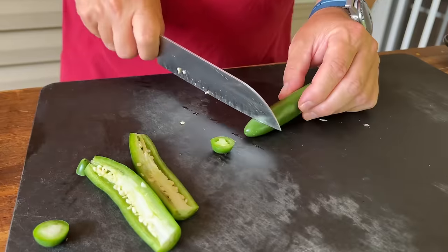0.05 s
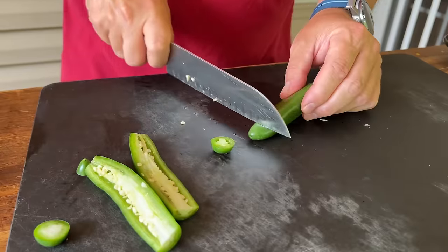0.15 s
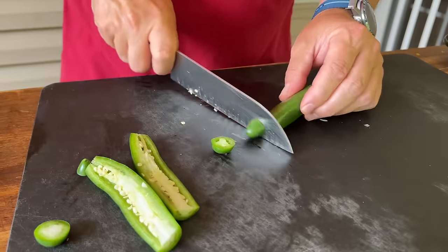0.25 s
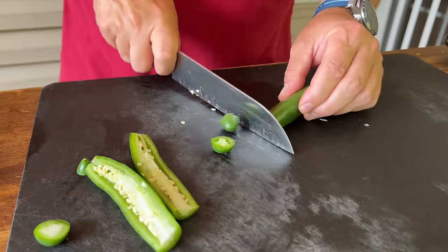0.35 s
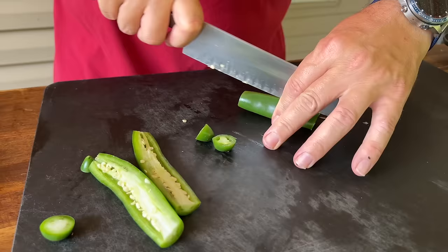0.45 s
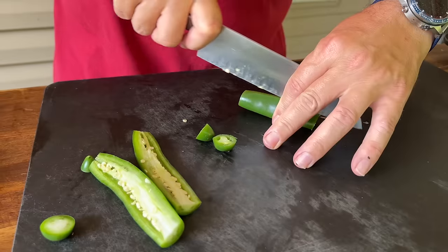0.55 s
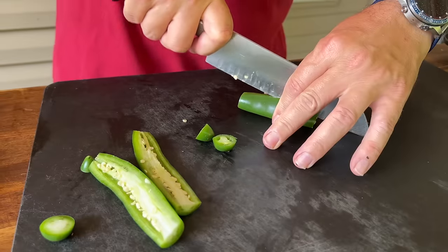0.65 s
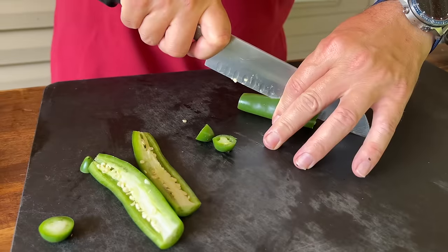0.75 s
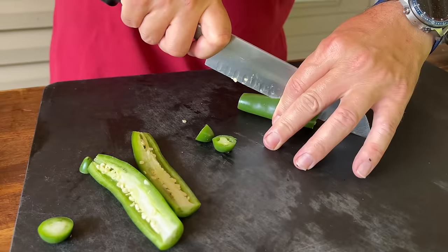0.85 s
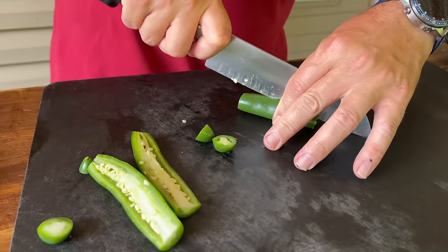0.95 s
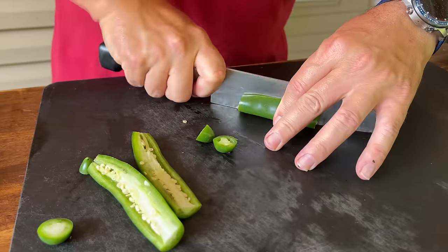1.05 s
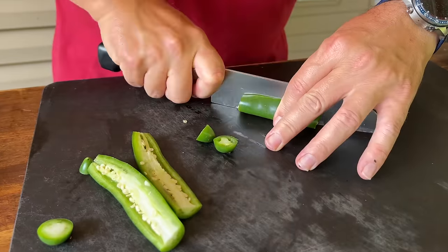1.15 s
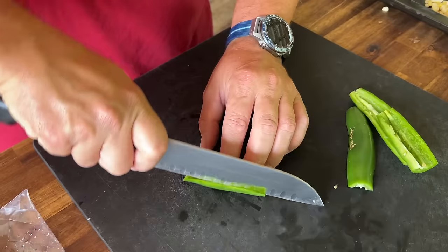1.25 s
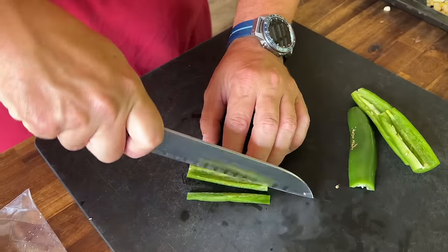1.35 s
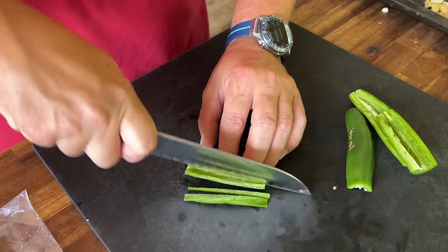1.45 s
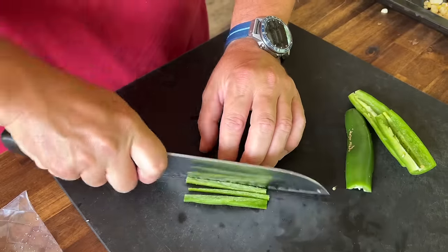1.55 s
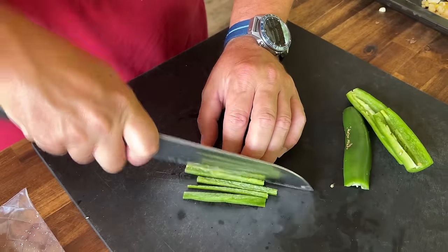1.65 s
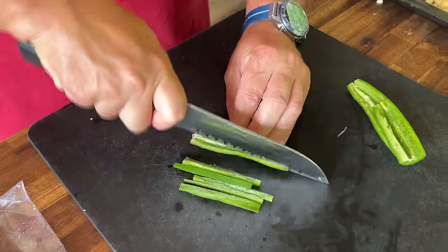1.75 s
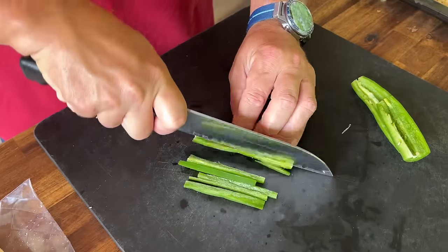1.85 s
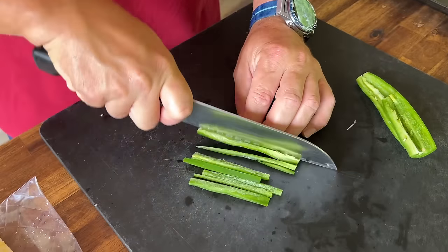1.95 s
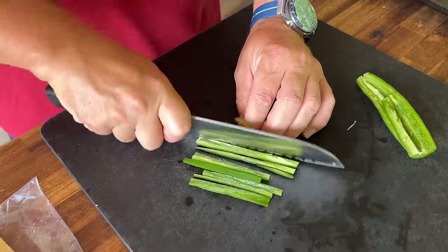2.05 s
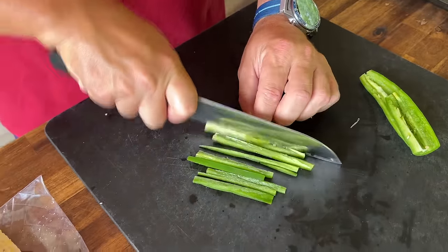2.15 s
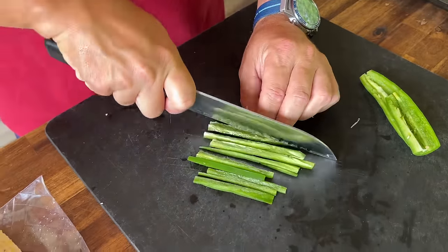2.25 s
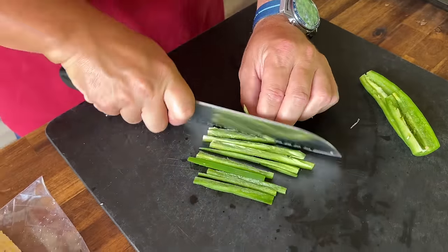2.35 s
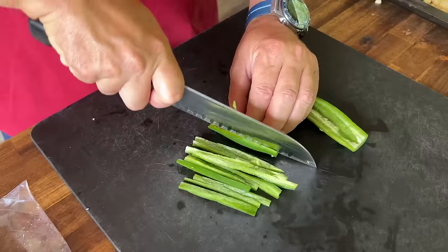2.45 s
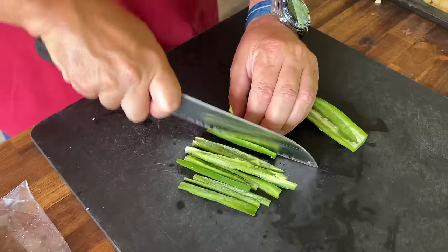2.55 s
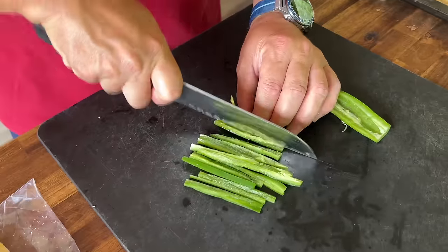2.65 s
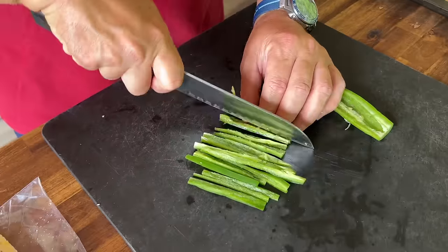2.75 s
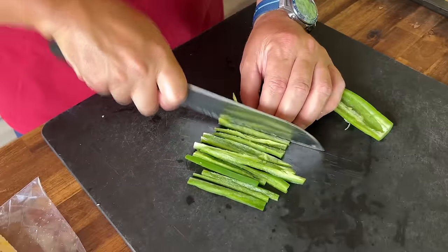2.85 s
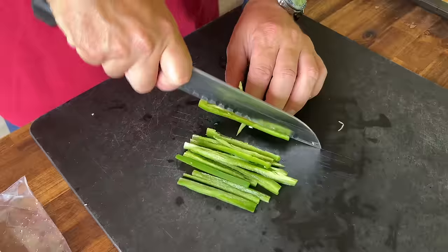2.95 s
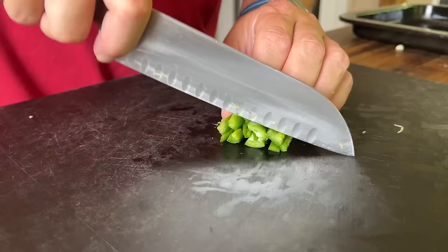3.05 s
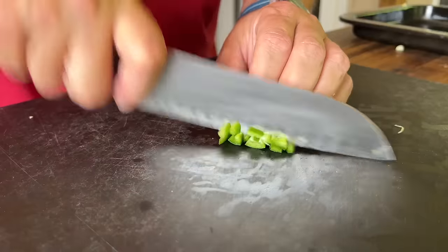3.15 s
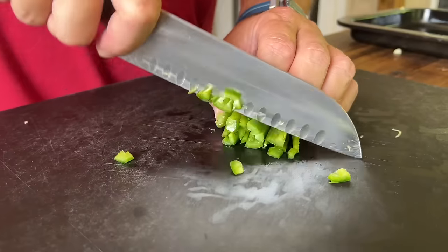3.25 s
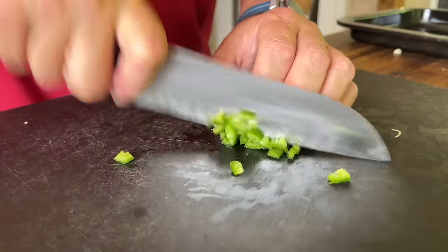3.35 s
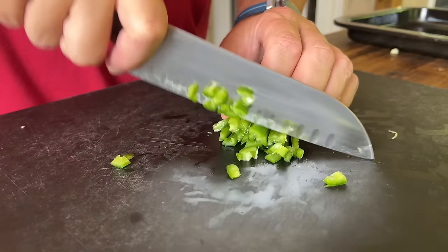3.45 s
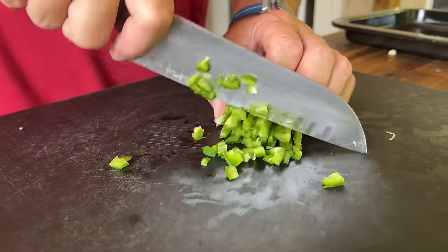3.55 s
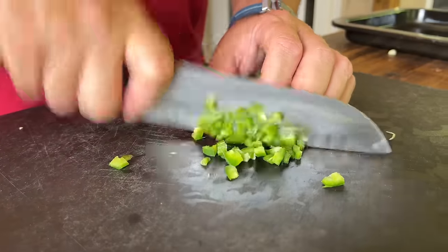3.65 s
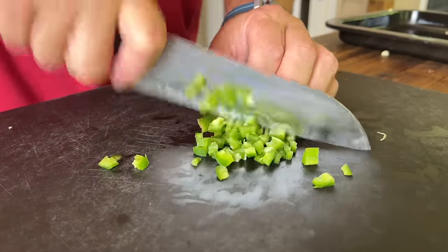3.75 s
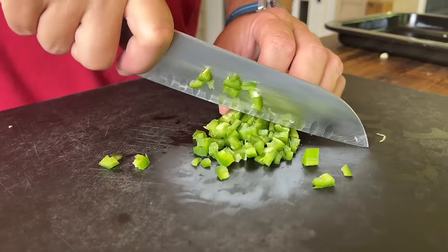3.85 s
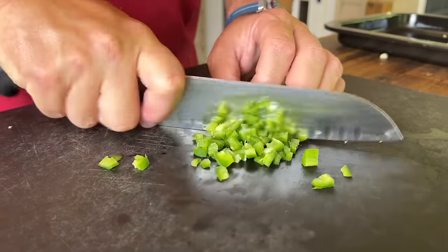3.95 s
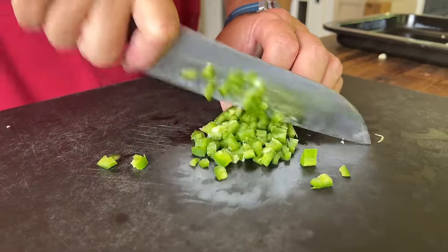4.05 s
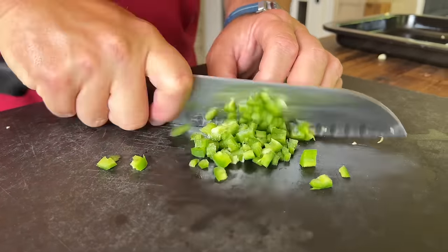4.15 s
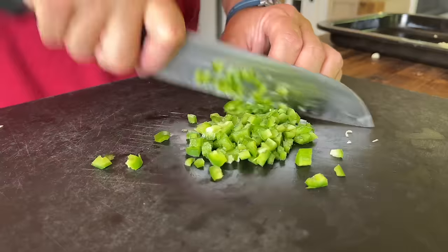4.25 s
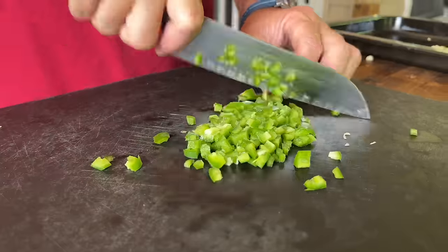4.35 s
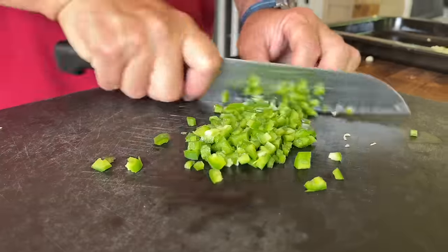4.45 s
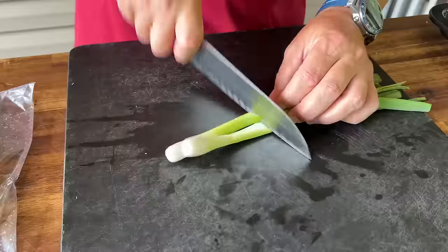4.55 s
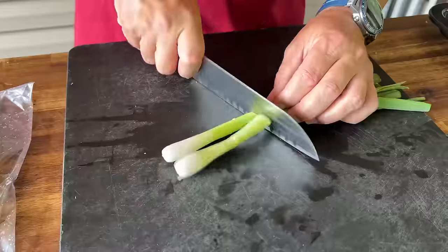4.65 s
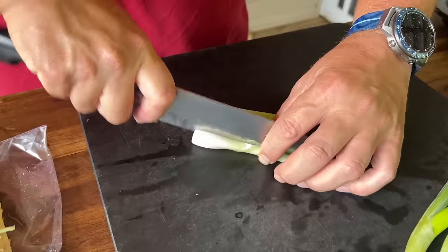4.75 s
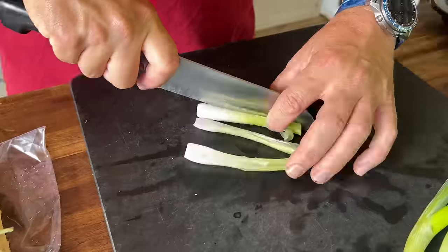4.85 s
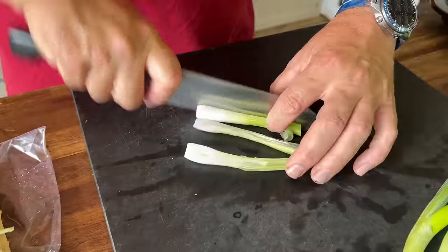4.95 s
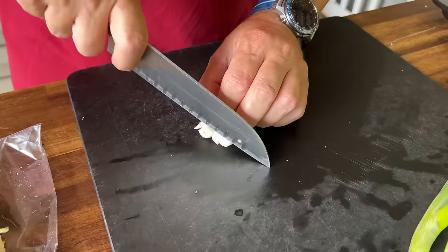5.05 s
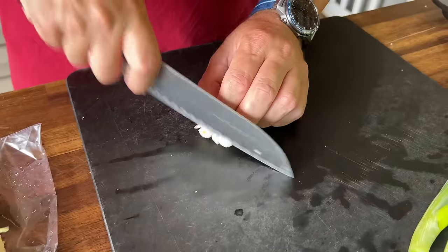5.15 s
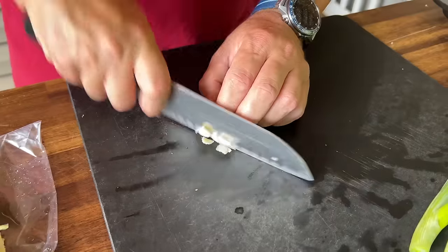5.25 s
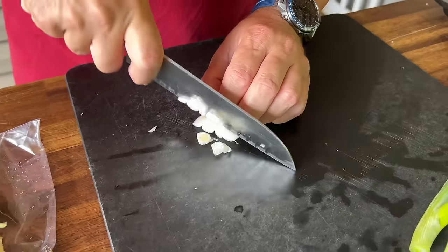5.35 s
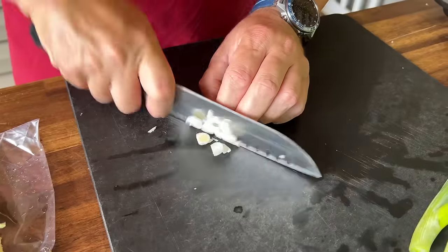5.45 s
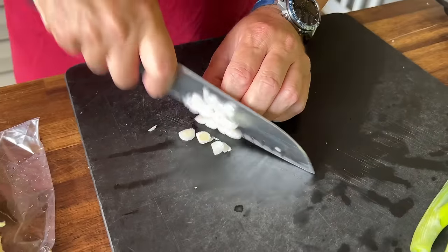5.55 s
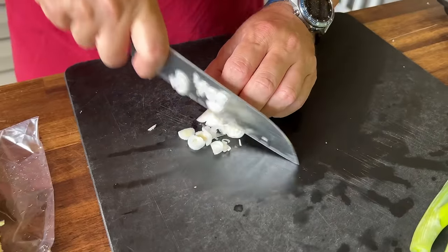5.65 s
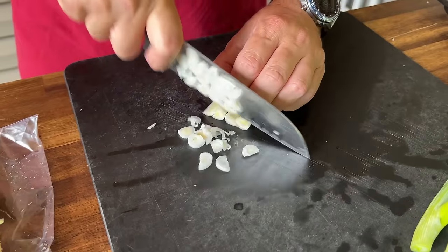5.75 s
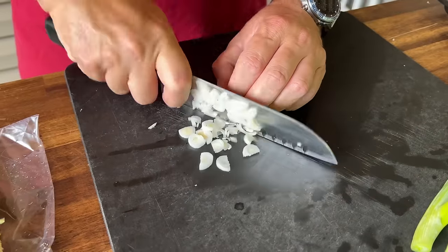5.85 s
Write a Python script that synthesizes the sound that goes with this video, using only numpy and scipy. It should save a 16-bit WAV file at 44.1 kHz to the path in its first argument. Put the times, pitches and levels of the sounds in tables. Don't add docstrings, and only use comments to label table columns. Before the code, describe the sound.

Close stereo sound of a chef's knife cutting green peppers and spring onions on a plastic board over a wooden table. Two hard clacks come early, then a pause, then crisp tearing strokes with snapping skin and dull thumps, fastest and fullest in the middle. Lighter, more spaced cuts end it. Distant insects and light breeze outdoors; edits cut thumps and echoes short.

```python
import sys
import numpy as np
from scipy import signal
from scipy.fft import rfft, irfft, next_fast_len
from scipy.io import wavfile
from scipy.ndimage import uniform_filter1d, map_coordinates

SR = 44100
rng = np.random.default_rng(int(sys.argv[2]) if len(sys.argv) > 2 else 0)


def dump_mix(stems):
    frames = np.atleast_2d(stems).T
    limited = np.clip(frames, -1, 1)
    pcm = np.round(limited * 32767).astype(np.int16)
    wavfile.write(sys.argv[1], SR, pcm)


def volts_from_db(level):
    exponent = np.asarray(level, float) / 20
    return 10 ** exponent


N = 259749

# pitch_hz, level_db
PORCH = [(30, -36), (90, 9), (232, 0.5), (483, -6), (766, -14.5), (1360, -13), (2400, -20), (4130, -12.5),
         (4600, -15.5), (5130, -13.5), (7510, -20.5), (9580, -38), (11600, -45), (15200, -29), (16500, -35)]
PORCH_DB, INSECT_DB, RUMBLE_DB, LEAVES_DB = -56, -64.5, -54, -64.5
# time_s, level_db
BREEZE = [(0, -2.5), (.35, 4), (1.2, -1.8), (1.7, 0.5), (2.4, -2.5), (3.2, 1), (4.6, 5.5), (5.05, -5),
          (5.3, 4), (5.89, -3.5)]
# time_s, level_db
HANDS = [(0, -3), (.9, -15.5), (1.1, -3), (2.4, -18), (2.55, -6), (4.6, -6), (4.95, 3.5), (5.1, -12),
         (5.89, -3)]
# pitch_hz, width_hz, level_db
WING = [(4620, 250, -10.5), (5210, 210, -1), (5590, 250, -6.5), (6490, 220, -8.5), (5600, 1800, -14)]
# first_pulse_s, end_s, level_db, pulse_rate_hz
SWELLS = [
    (0.75, 1.148, 4.5, 55),
    (1.361, 1.619, 15, 56.7),
    (2.3953, 2.799, 15.5, 54.3),
    (2.789, 2.956, 14.5, 53.4),
    (3.276, 3.79, 10.5, 55),
    (4.201, 4.444, 10.5, 54),
]
CHIRP_DB, CHIRP_RISE = 18, .15

# pitch_hz, t60_s
WALLS = [(100, 0.2), (500, 0.64), (2000, 0.29), (6000, 0.3), (9000, 0.17), (14000, 0.14)]
REFILL_S = 0.043
WASH_DIP = 0.28

# pitch_hz, difference_minus_sum_db
PORTS = [(60, -23), (99, -12.5), (160, -14), (270, -14), (450, -11), (740, -5.5), (1220, -6), (2010, -1.5),
         (3330, 1), (5500, -1.5), (9080, 3.5), (15000, -4)]
# pitch_hz, lead_radians
TURN = [(100, 0.55), (1200, 1.65), (2200, 1.37), (4000, 0.86), (6400, 0.87), (8300, 1.52), (15000, 1.56)]
# low_hz, high_hz, threshold_db
SQUELCH = [
    (9000, 9650, -71),
    (9650, 11000, -64),
    (11000, 11700, -77),
    (11700, 12400, -81),
    (12400, 13100, -82),
    (13100, 13800, -82),
    (13800, 14500, -82),
    (14500, 15200, -81),
    (15200, 15900, -76),
    (15900, 16800, -70),
]

# time_s, pitch_hz, level_db, t60_s
NOTES = [(1.062, 990, -35, 0.096), (1.707, 810, -37, 0.065), (1.943, 1070, -34, .04),
         (1.965, 754, -34.5, 0.041), (2.203, 835, -35, 0.075), (2.232, 990, -43.5, 0.048),
         (2.1, 310, -47, 0.1), (2.622, 990, -35.5, 0.07), (2.725, 1005, -27.5, 0.049),
         (2.893, 833, -29, 0.076), (3.21, 318, -33.5, .078), (3.408, 1020, -30.5, .04),
         (3.68, 977, -32, 0.074), (3.82, 443, -30, 0.078), (3.958, 990, -32.5, .07), (4.7, 920, -44, .09),
         (4.148, 516, -40, 0.05), (4.298, 950, -31, 0.097), (4.302, 553, -32.5, 0.014),
         (4.442, 556, -14.5, .019), (4.735, 865, -41.5, 0.056), (4.83, 950, -42.5, 0.076),
         (5.469, 947, -37.5, 0.077)]
# time_s, pitch_hz, level_db, t60_s
TICKS = [(.0745, 900, -37.5, 0.015), (.184, 900, -37.5, .01), (.2445, 743, -18, 0.014),
         (.2535, 1960, -13.5, .02), (.2585, 1960, -17.5, .014), (.2665, 920, -17.5, .04),
         (.5, 1600, -48, .015), (.568, 2020, -44, .01), (.577, 2100, -41, 0.0089),
         (.591, 1900, -41, 0.0091), (.6115, 4000, -26, 0.011), (.617, 1410, -13, .012),
         (.6258, 2050, -9, .012), (.6275, 280, -15, .025), (.633, 1950, -21, .012),
         (.6375, 2050, -17.5, .012), (.9873, 2020, -36, 0.022), (1.0092, 1800, -34, 0.021),
         (1.021, 3900, -34, .01), (1.032, 8200, -33, .01), (1.0412, 1900, -24, 0.0089),
         (1.054, 3850, -29, .008), (1.0572, 2030, -18, .01), (1.0578, 7840, -20, .008),
         (1.063, 780, -30.5, 0.027), (1.6588, 4800, -37, .008), (1.835, 2560, -36, .02),
         (1.84, 740, -36, 0.058), (1.842, 370, -35.5, 0.038), (2.028, 2260, -29, .02),
         (2.035, 1470, -33.5, 0.028), (2.17, 2240, -39, 0.018), (2.6198, 4300, -24.5, .01),
         (2.723, 780, -28.5, 0.036), (2.865, 5200, -41, .008), (2.885, 1810, -36, 0.023),
         (3.677, 1770, -23.5, .015), (3.8095, 2010, -23, 0.024), (4.136, 2300, -24, .012),
         (4.257, 2200, -28, .012), (4.284, 2300, -22.5, 0.01), (4.292, 1520, -28, 0.018),
         (4.545, 1150, -40, .03), (4.572, 1300, -23.5, 0.0086), (4.662, 500, -41, 0.023),
         (4.765, 1620, -29, 0.011), (4.82, 3630, -32, .015), (4.833, 1800, -29.5, .012),
         (5.285, 460, -39, 0.026), (5.61, 730, -32.5, 0.019)]
NOTE_RISE_S, TICK_RISE_S, NOTE_WAVER = 0.0031, 0.00038, 0.032

# deepest_swing_s, thump_db, hardness_db, until_scene_change_s
LANDINGS = [(1.0839, -30, -5.5, 0.087), (1.5632, -26.5, -9, 0.04), (1.732, -35, -13, 0.026),
            (1.8681, -34.5, -10.5, 0.023), (2.058, -34, 5, 0.053), (2.224, -30.5, -6.5, .028),
            (2.3704, -28, -15, 0.043), (2.6496, -34.5, -25, 0.0036), (2.7527, -26, -6.5, 0.035),
            (2.9152, -21.5, -19.5, 0.0345), (3.227, -25, -11.5, .052), (3.4305, -20.5, -10, 0.02),
            (3.564, -19.5, -1, 0.024), (3.7111, -19.5, -13.5, 0.0097), (3.842, -20, -6, 0.011),
            (3.9801, -20.5, 1.5, 0.038), (4.1671, -23.5, 1.5, .043), (4.3385, -22, -15, 0.039),
            (4.4649, -23.5, 1, 0.048), (4.642, -31, -21, 0.06), (5.001, -43, -5, 0.021),
            (5.3147, -32, -9, 0.047), (5.4986, -41.5, -3, 0.082), (5.6409, -23.5, -7, 0.0151),
            (5.8739, -24.5, -7, .05), (4.661, -36, -12, .057)]
# pitch_hz, crest_before_deepest_swing_s, rise_s, t60_s, level_db
THUMP = [(83.7, -0.0061, 0.016, 0.037, -0.96)]
TABLE = [(59.2, -0.0157, 0.033, 0.33, -2.3)]
HEEL = [
    (130.4, 0.01284, 0.0031, 0.033, 0.5),
    (320, 0.01824, 0.0009, 0.054, -3),
]
KNOCK = [
    (491.5, 0.017, 0.0056, 0.0031, -0.5),
    (1026, 0.03, 0.00096, 0.067, -8.5),
]
RING_DB, RING_GROWS, HEEL_DB, KNOCK_DB = -2.5, 0.42, 1, 0

# start_s, end_s, pitch_hz, width_hz,
# level_db
DRAGS = [
    (0.962, 1.03, 1830, 790, -46),
    (1.0, 1.075, 1550, 450, -40.5),
    (4.025, 4.138, 2000, 460, -52),
    (5.08, 5.31, 1670, 370, -53),
    (5.38, 5.5, 1720, 150, -54),
    (5.655, 5.78, 1680, 250, -51.5),
    (4.915, 5.005, 910, 120, -50.5),
    (4.63, 4.715, 130, 220, -56),
    (3.1, 3.2, 2700, 1800, -46.5),
    (.99, 1.06, 3800, 310, -49),
]
# level_db, pitch_hz, t60_s
POP = (-10.5, 975, 0.12)
POP_S = 3.0642

# time_s, peak_db
SKIN = [(.0615, -29), (.0855, -30), (.1126, -24.5), (.1321, -22), (.1578, -27), (.177, -28.5),
        (1.2221, -30), (1.3036, -28), (1.3322, -26), (1.4571, -36), (1.5324, -12), (1.6588, -21.5),
        (2.0288, -8), (2.1954, -29), (2.3206, -43), (2.5738, -21), (2.695, -23), (2.8652, -28),
        (3.1965, -18.5), (3.6147, -24), (3.6391, -21), (3.6559, -25), (3.7414, -21), (3.7861, -20.5),
        (4.1345, -13.5), (4.2831, -36), (4.3875, -44), (4.5945, -26.5), (4.8325, -35), (.0463, -54),
        (.1999, -43), (.4993, -39), (.59, -27.5), (1.2447, -32), (1.4293, -32.5), (1.5181, -24),
        (1.789, -32), (1.9022, -30.5), (1.9915, -29), (2.0205, -32), (2.1327, -32), (2.1567, -24.5),
        (.166, -42), (2.4515, -36), (2.4814, -35), (2.5049, -33), (2.5248, -32.5), (.1195, -31),
        (2.8466, -37), (3.0122, -26.5), (3.3652, -28), (3.7967, -12.5), (4.0352, -33), (4.8174, -26),
        (4.977, -30), (4.999, -48), (5.413, -32), (5.5782, -27), (5.7268, -35)]
# time_s, peak_db
RIBS = [(.0752, -47.5), (.1449, -30.5), (.5772, -44), (1.0085, -48), (1.0412, -26.5), (1.0575, -18),
        (1.832, -23.5), (1.882, -30), (1.9405, -27), (2.172, -22), (2.6198, -19), (2.7234, -24.5),
        (2.8857, -25.5), (3.0321, -28), (3.1446, -28), (3.3961, -15), (3.488, -23.5), (3.5249, -16.5),
        (3.6752, -20), (3.8095, -18.5), (3.9334, -35), (4.121, -20), (4.2567, -26), (4.4158, -22),
        (4.4259, -21), (4.5426, -44), (4.5715, -19), (4.7645, -22.5), (4.9914, -31), (.568, -38),
        (1.0105, -34), (1.0215, -32.5), (1.0535, -26.5), (1.4732, -30.5), (1.6967, -39), (1.8094, -32),
        (2.199, -29.5), (2.3372, -22), (2.7134, -39), (3.3462, -32.5), (3.3796, -46), (3.5054, -25.5),
        (3.896, -41), (3.9264, -23), (4.112, -22), (4.5535, -46), (4.7321, -35.5), (4.9221, -34)]
SKIN_SHARE_DB, RIB_SHARE_DB = -14.5, -6.5
# level_db, t60_s
SKIN_TAIL = (2, 0.019)
# level_db, t60_s
RIB_TAIL = (-12.5, 0.019)

# pitch_hz, level_db_per_hz
FLESH = [(880, -37), (1500, 2), (1640, -5), (2090, -15.5), (2310, 0.5), (3120, -2.5), (3520, 0), (3970, -4),
         (7620, 0.5), (8680, -0.5), (10100, -12.5), (11600, -2), (14200, 1), (16000, -5), (16500, -92)]
# pitch_hz, width_hz, level_db
BOARD = [
    (310, 380, -3.5),
    (637, 620, -0.5),
    (891, 400, 1.5),
    (1494, 390, -0.5),
    (1620, 288, 2),
    (2150, 506, -6.5),
    (3650, 1460, -10),
]
# full_bite_s, crunch_db, push_s, board_share_db
SLICES = [(1.056, -32, 0.057, -1.5), (1.475, -44, 0.083, 1.5), (1.535, -31, 0.032, -1),
          (1.699, -33, 0.048, -2.5), (1.831, -36.5, 0.077, -4), (1.966, -39, 0.12, 1),
          (2.025, -29, 0.045, -2), (2.192, -37.5, 0.079, 1), (2.326, -34, 0.021, -0.5),
          (2.62, -33, 0.2, -4), (2.721, -33.5, 0.053, 2.5), (2.886, -33.5, 0.054, -2),
          (3.062, -39, 0.11, 0.5), (3.192, -40, 0.093, 8)]
DICES = [(3.389, -35.5, 0.089, 3.9), (3.527, -32, 0.053, 5.1), (3.674, -32.5, 0.081, 3.9),
         (3.8, -31, 0.063, 1.6), (3.947, -35, 0.08, 6.2), (4.134, -36.5, 0.095, 8.1),
         (4.291, -33, 0.062, 3.7), (4.425, -39.5, 0.037, 16), (4.577, -41.5, 0.11, 4.1)]
ONIONS = [
    (4.989, -34.5, 0.13, -4),
    (5.273, -39.5, 0.18, -2.5),
    (5.458, -36.5, 0.056, -4.5),
    (5.601, -37.5, 0.058, 0.5),
    (5.736, -38.5, 0.075, -6),
    (5.838, -38.5, 0.058, 2),
]
# entry_db under full bite, board_share_db lower at entry, bite_holds_s,
# crunch_dies_db_per_s, board_dies_db_per_s
GIVE = [
    (21.2, 6, 0.0032, 1100, 494),
    (24.9, 9.5, 0.0099, 1300, 516),
    (20.5, -0.5, 0.0075, 1000, 433),
]
ROUNDING = 0.94
# start_s, length_s, start_db, end_db, board_share_db
SAWING = [(0, 0.015, -66, -62, 23.5), (0.073, 0.04, -60, -68.5, -2.5), (0.132, 0.1, -52, -54.5, -0.5),
          (0.472, 0.14, -69.5, -51.5, -5), (1.22, .072, -45.5, -45, -1.5), (1.293, 0.092, -45.5, -40, -3),
          (1.455, .03, -39, -39.5, -4.5), (1.936, 0.033, -42.5, -42.5, 0.5),
          (2.163, 0.043, -42.5, -42, -0.5), (4.258, 0.024, -53, -44, 15.5), (4.586, 0.0298, -41.5, -39, 1),
          (4.72, 0.12, -43, -33.5, -6.5), (4.842, 0.035, -39, -69, 1)]

# time_s, peak_db, lead_in_s, lead_in_db, until_scene_change_s
CHOPS = [
    (0.2529, -2.5, 0.0102, -18.5, 0.235),
    (0.621, -6, 0.011, -15, 0.43),
]
# pitch_hz, level_db, t60_s
BLADE = [
    [(118,-21,0.13),(155,-12.5,0.056),(282,-35.5,1),(434,-21.5,0.14),(632,-26,0.13),(922,-20.5,0.21),(1332,-14.5,0.13),(1576,-17,0.083),(1975,-5,0.054),(2177,-22.5,0.13),(2305,-15.5,0.15),(3680,-21,0.16),(5690,-14.5,0.053)],
    [(121.6,-2,0.19),(172,0,0.051),(278.6,-19,0.71),(440,-17,0.26),(518,-8,0.054),(782,-20,0.15),(995,-9,0.18),(1345,3,0.052),(1594,-4,0.081),(1825,-8,0.07),(2060,-5,0.11),(2280,-9,0.07),(3960,-15.5,0.06),(5950,-40,0.12)],
]
# after_chop_s, level_db under it
BOUNCES = [
    [(.0024, -23), (.0065, -3.5), (.0135, -12.5), (.021, -17.5)],
    [(.0048, -3), (.012, -19), (.017, -18), (.03, -23)],
]
RESTRIKE_DB = (-7, -3)
# level_db under the chop, pitch_hz, width_hz, t60_s
THUD = [
    (-12.5, 130, 260, 0.043),
    (-9.5, 500, 250, 0.047),
]
# pitch_hz, level_db_per_hz
CRACK = [(290, -38.5), (500, -13), (800, -16), (1400, -12), (2010, -2.5), (2700, -13), (3300, -18),
         (3990, -8.5), (5040, -21.5), (5840, -15), (6470, -20), (8500, -22), (10200, -45.5), (14500, -25.5),
         (16500, -42)]
MODE_RISE_S, MODE_WAVER = 0.001, 0.0697
TWIN = 0.95


def unit(x):
    return x / np.sqrt(np.mean(x ** 2) + 1e-20)


def decay(t, t60, db=0):
    return volts_from_db(db - 60 * t / t60)


def swell_and_die(u, rise, t60):
    return np.where(u < 0, np.exp(-(u / rise) ** 2), decay(np.abs(u), t60))


def wander(count):
    return np.cumsum(rng.standard_normal(count))


def along(points, hz):
    f, v = np.transpose(points)
    return np.interp(np.log(hz + 1), np.log(f + 1), v)


def filtered(x, response):
    m = next_fast_len(N + SR // 2)
    return irfft(rfft(x, m) * response(np.fft.rfftfreq(m, 1 / SR)), m)[..., :N]


def coloured(x, points):
    def response(hz):
        cep = irfft(np.log(volts_from_db(np.maximum(along(points, hz), -60))))
        cep[1:len(cep) // 2] *= 2
        cep[len(cep) // 2 + 1:] = 0
        return np.exp(rfft(cep))
    return filtered(x, response)


def resonator(x, hz, width):
    return signal.lfilter(*signal.iirpeak(hz, hz / width, SR), x)


def smooth_field(shape, bands, frames):
    field = uniform_filter1d(rng.standard_normal(shape), size=bands, axis=0)
    return unit(uniform_filter1d(field, size=frames, axis=1))


def patchy(x, depth_db):
    z = signal.stft(x, nperseg=256)[2]
    gain = volts_from_db(depth_db * smooth_field(z.shape, 5, 9))
    return unit(signal.istft(z * gain, nperseg=256)[1][:N])


def drifting(x, turns):
    z = signal.stft(x, nperseg=256)[2]
    turn = np.exp(1j * turns * smooth_field(z.shape, 7, 16))
    return signal.istft(z * turn, nperseg=256)[1][:N]


def add(out, s, sound):
    out[round(s * SR):][:len(sound)] += sound[:len(out) - round(s * SR)]


def insects():
    t = np.arange(N) / SR
    chorus = unit(filtered(rng.standard_normal((2, N)), lambda hz: sum(
        volts_from_db(db) * np.exp(-((hz - c) / w) ** 2) for c, w, db in WING)))
    for start, end, db, pulse_hz in SWELLS:
        cycle = (t - start) * pulse_hz % 1
        pulse_db = CHIRP_DB * (.5 - np.maximum(1 - cycle / CHIRP_RISE, cycle)) * db / 16
        gate = np.clip((t - start) / 0.014, 0, 1) * np.clip((end - t) / 0.007, 0, 1)
        chorus = chorus * volts_from_db((db + pulse_db) * gate)
    return volts_from_db(INSECT_DB) * chorus


def porch():
    t = np.arange(N) / SR
    mid, side = coloured(rng.standard_normal(N), PORCH), coloured(rng.standard_normal(N), PORCH)
    side = filtered(side, lambda hz: volts_from_db(along(PORTS, hz)))
    wash_db = PORCH_DB + np.interp(t, *np.transpose(BREEZE))
    air = volts_from_db(wash_db) * unit(np.array([mid + side, mid - side]))
    leaves = unit(filtered(rng.standard_normal((2, N)), lambda hz: hz > 6000)) * (t > 1.21)
    rumble = unit(filtered(rng.standard_normal(N), lambda hz: np.exp(-((hz - 75) / 45) ** 2)))
    rumble_db = RUMBLE_DB + np.interp(t, *np.transpose(HANDS))
    return air + volts_from_db(LEAVES_DB) * leaves + volts_from_db(rumble_db) * rumble + insects()


def walls(x):
    hz, t, z = signal.stft(rng.standard_normal((2, SR // 2)), SR, nperseg=256)
    tail = signal.istft(z * decay(t, along(WALLS, hz)[:, None]), SR, nperseg=256)[1]
    return signal.fftconvolve(x[None], tail / np.linalg.norm(tail[0]), axes=1)[:, :N]


def echo_kept():
    t, kept = np.arange(N) / SR, np.ones(N)
    for s, *_, left in LANDINGS:
        since = t - s - left
        kept = np.minimum(kept, np.where(since > 0, np.clip(since / REFILL_S, 0, 1) ** 2, 1))
    return kept * (np.abs(t - .548) > .062)


def notes():
    out, u = np.zeros(N), np.arange(-SR // 100, SR // 10) / SR
    for rows, rise in ((NOTES, NOTE_RISE_S), (TICKS, TICK_RISE_S)):
        for s, hz, db, t60 in rows:
            waver = NOTE_WAVER * np.sqrt(hz / 1000) * wander(len(u))
            add(out, s + u[0], volts_from_db(db) * swell_and_die(u, rise, t60) * np.cos(2 * np.pi * hz * u + waver))
    return out


def landings():
    out, t = np.zeros(N), np.arange(-SR // 25, SR // 8) / SR
    for s, db, hard_db, left in LANDINGS:
        sound = np.zeros(len(t))
        parts = ((THUMP, 0), (TABLE, RING_DB + RING_GROWS * hard_db),
                 (HEEL, HEEL_DB + hard_db), (KNOCK, KNOCK_DB + hard_db))
        for waves, gain_db in parts:
            for hz, early, rise, t60, level_db in waves:
                level_luck, pitch_luck = rng.standard_normal(2)
                u = t + early
                crest = t if waves is THUMP else u
                level = volts_from_db(gain_db + level_db + level_luck * (early > 0))
                swing = np.cos(2 * np.pi * hz * (1 + 0.032 * pitch_luck) * crest)
                sound -= level * swell_and_die(u, rise, t60) * swing
        add(out, s + t[0], volts_from_db(db) * sound * np.clip((left - t) / .003, 0, 1))
    return out


def drags():
    out = np.zeros(N)
    for start, end, hz, width, db in DRAGS:
        t = np.arange(round((end - start) * SR)) / SR
        rub = resonator(rng.laplace(size=len(t)), hz, width)
        add(out, start, volts_from_db(db) * unit(rub) * np.abs(np.sin(np.pi * t / t[-1])) ** 0.89)
    return out


def pop():
    db, hz, t60 = POP
    t = np.arange(round(.023 * SR)) / SR
    out, waver = np.zeros(N), wander(len(t)) * .07
    shape = (decay(t, 0.013) + decay(t, t60, -17)) * (1 - np.exp(-t / 0.00095))
    add(out, POP_S, volts_from_db(db) * shape * np.sin(2 * np.pi * hz * t + waver))
    for ratio, under_db, dies in ((1.78, 14.5, 0.023), (0.556, 15.4, 0.026), (1.1, 43.0, 0.042)):
        add(out, POP_S + 0.00033, decay(t, dies, db - under_db) * np.sin(2 * np.pi * ratio * hz * t + waver))
    return out


def board(hz):
    return sum((-1) ** k * volts_from_db(db) * 1j * hz * w / (c * c - hz * hz + 1j * hz * w)
               for k, (c, w, db) in enumerate(BOARD))


def snaps():
    t = np.arange(SR // 50) / SR
    bright, dull = np.zeros(N), np.zeros(N)
    front = 1 - np.exp(-t / 0.00035)
    kinds = ((SKIN, SKIN_SHARE_DB, SKIN_TAIL), (RIBS, RIB_SHARE_DB, RIB_TAIL))
    for rows, share_db, (tail_db, tail) in kinds:
        for s, db in rows:
            air_spray, board_spray = front * rng.standard_normal((2, len(t)))
            crack = (decay(t, 0.0024) + decay(t, tail, tail_db)) * air_spray
            add(bright, s, volts_from_db(db - 20) * unit(crack))
            add(dull, s, volts_from_db(db + share_db - 13) * unit(decay(t, 0.024) * board_spray))
    through_board = filtered(dull, lambda hz: board(hz) * 1j * hz / (700 + 1j * hz))
    return coloured(bright, FLESH) + volts_from_db(15.5) * through_board


def crackle(rate, spread_db, hiss):
    size = volts_from_db(spread_db * np.minimum(rng.exponential(size=N), 3)) * rng.standard_normal(N)
    clumps = map_coordinates(rng.standard_normal(N // 200 + 4), [np.arange(N) / 200])
    bursts = unit(size * (rng.random(N) < rate / SR))
    return (bursts + hiss * rng.standard_normal(N)) * volts_from_db(2.33 * clumps)


def strokes():
    bright, dull, after = np.zeros(N), np.zeros(N), np.arange(SR // 8) / SR
    for rows, (entry_db, late_db, hold, dies, board_dies) in zip((SLICES, DICES, ONIONS), GIVE):
        for s, db, push, share_db in rows:
            to_go = np.linspace(1, 0, round(push * SR)) ** ROUNDING
            start = s - len(to_go) / SR
            bite_under_db = np.r_[entry_db * to_go, dies * np.maximum(after - hold, 0)]
            board_under_db = np.r_[(entry_db + late_db) * to_go, board_dies * after]
            add(bright, start, volts_from_db(db - bite_under_db))
            add(dull, start, volts_from_db(db + share_db - board_under_db))
    for s, length, first_db, last_db, share_db in SAWING:
        force = volts_from_db(np.linspace(first_db, last_db, round(length * SR)))
        add(bright, s, force)
        add(dull, s, volts_from_db(share_db) * force)
    tearing = patchy(coloured(crackle(rate=2500, spread_db=1.5, hiss=1.0), FLESH), depth_db=4.0)
    shaking = patchy(filtered(crackle(rate=4300, spread_db=2.0, hiss=.7), board), depth_db=1.5)
    return volts_from_db(-2.5) * bright * tearing + volts_from_db(-3.5) * dull * shaking


def chop_ring():
    ring, t = np.zeros(N), np.arange(SR * 2 // 5) / SR
    settings = zip(CHOPS, BLADE, (-5, -14), BOUNCES, RESTRIKE_DB, THUD)
    for (s, db, _, _, left), modes, ring_db, bounces, again_db, (thud_db, thud_hz, width, dies) in settings:
        thud = resonator(rng.standard_normal(len(t)), thud_hz, width)
        add(ring, s, decay(t, dies, db + thud_db) * unit(thud))
        for hz, level_db, t60 in modes:
            waver = wander(len(t)) * (MODE_WAVER + .2 * (hz / 4000) ** 2)
            phase = 2 * np.pi * hz * t
            shape = decay(t, t60, db + ring_db + level_db) * (1 - np.exp(-t / MODE_RISE_S))
            mode = shape * (np.sin(phase + waver) + TWIN * np.sin(phase - waver))
            add(ring, s, mode * (t < left))
            for late, under_db in bounces:
                add(ring, s + late, volts_from_db(under_db + again_db) * mode * (t < left - late))
    return ring


def chop_rattle():
    rattle, t = np.zeros(N), np.arange(SR * 2 // 5) / SR
    before = t[:SR // 50]
    for (s, db, lead, lead_db, left), bounces in zip(CHOPS, BOUNCES):
        contact = decay(t, 0.0078) + decay(t, 0.024, -20.5) + decay(t, 0.36, -31)
        add(rattle, s, volts_from_db(db) * contact * rng.standard_normal(len(t)) * (t < left))
        for late, under_db in bounces:
            add(rattle, s + late, decay(t, 0.0039, db + under_db) * rng.standard_normal(len(t)))
        rising = volts_from_db(db + lead_db - 6.3 * (1.5 - before / lead)) * (before < lead)
        add(rattle, s - lead, rising * rng.standard_normal(len(before)))
    return volts_from_db(12.5) * coloured(rattle, CRACK)


def ports(x, scatter_db=-6):
    t = np.arange(1500) / SR
    bounce = rng.standard_normal(len(t)) * decay(t, 0.041)
    scattered = signal.fftconvolve(x, bounce / np.linalg.norm(bounce))[:N]
    shaded = 1.23 * x + volts_from_db(scatter_db) * drifting(scattered + 0.91 * x, turns=2.44)
    side = filtered(shaded, lambda hz: volts_from_db(along(PORTS, hz) - 4.5) * np.exp(1j * along(TURN, hz)))
    mid = filtered(x, lambda hz: volts_from_db(-6 * np.exp(-((hz - 10000) / 800) ** 2)))
    return np.array([mid + side, mid - side])


def scene():
    hard = filtered(chop_ring() + chop_rattle(), lambda hz: hz ** 2 / (hz ** 2 + 85 ** 2))
    cuts = strokes() + snaps() + drags()
    kept = echo_kept()
    near = ports(hard + cuts + pop() + landings() + notes())
    echo = walls(volts_from_db(-12.5) * hard + volts_from_db(-12) * cuts) * kept
    return near + echo + porch() * (1 - WASH_DIP * (1 - kept))


def band_limit(x):
    return signal.sosfilt(signal.butter(12, 16710, fs=SR, output="sos"), x)


def record(dry):
    out = filtered(np.clip(dry, -1, 1), lambda hz: volts_from_db(-14 * (hz > 15900)) * (hz < 16710))
    shift = 746
    hz, t, z = signal.stft(np.pad(out.mean(axis=0), (shift, 0)), SR, nperseg=2048)
    weak = np.zeros(z.shape)
    for low_hz, high_hz, db in SQUELCH:
        band = (hz > low_hz) & (hz <= high_hz)
        power = np.sum(np.abs(z[band]) ** 2, axis=0) * 4 / 3
        weak[band] = power < volts_from_db(db + 2 * rng.standard_normal(len(t))) ** 2
    out = out - signal.istft(z * weak, SR, nperseg=2048)[1][shift:][:N]
    return band_limit(out)


dry = scene()
out = record(dry)
dump_mix(out)
```